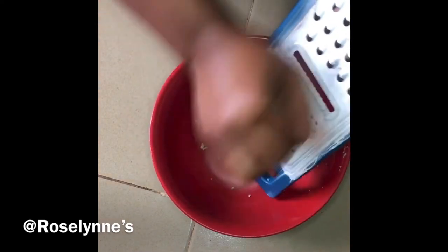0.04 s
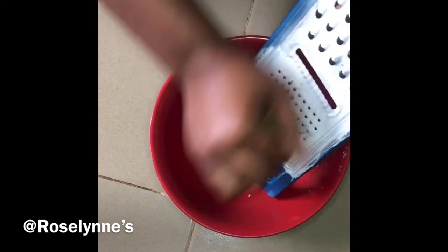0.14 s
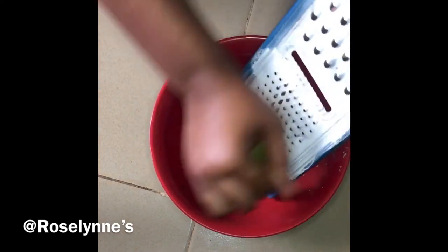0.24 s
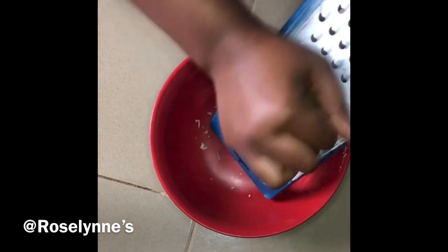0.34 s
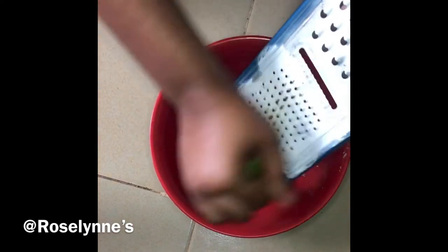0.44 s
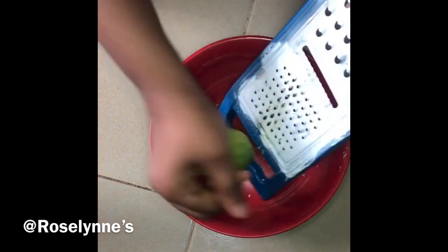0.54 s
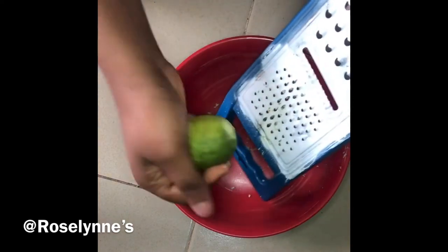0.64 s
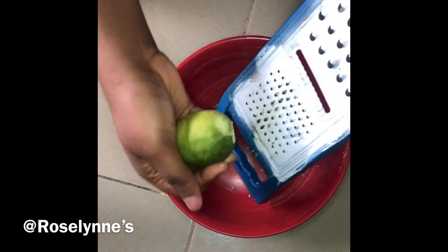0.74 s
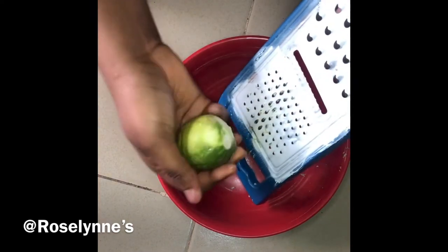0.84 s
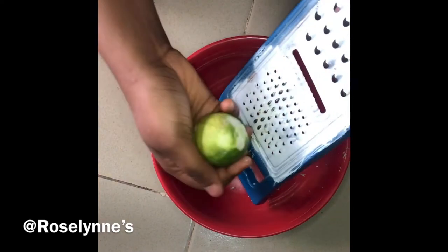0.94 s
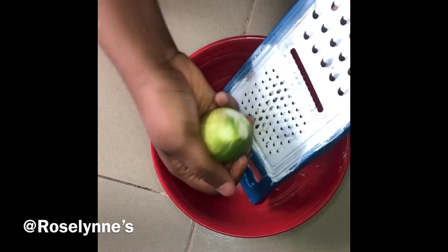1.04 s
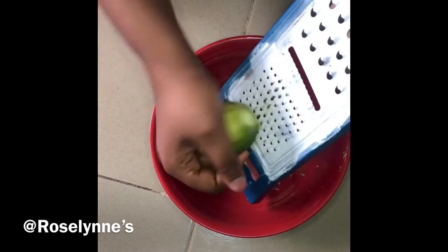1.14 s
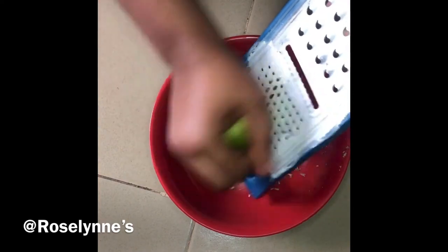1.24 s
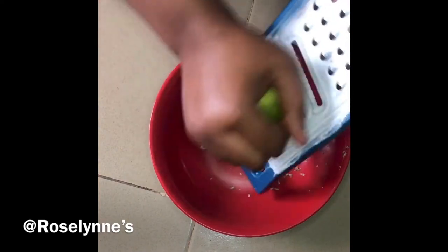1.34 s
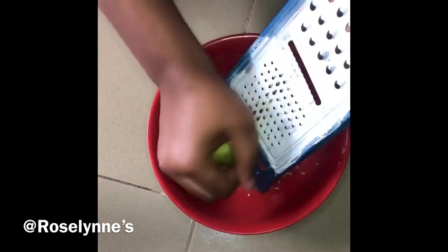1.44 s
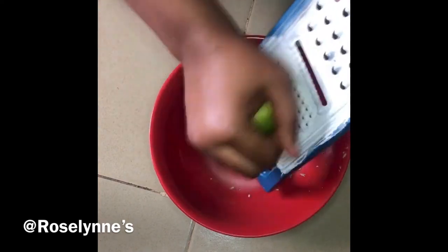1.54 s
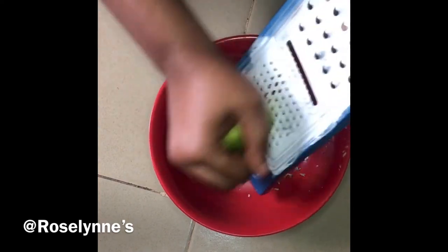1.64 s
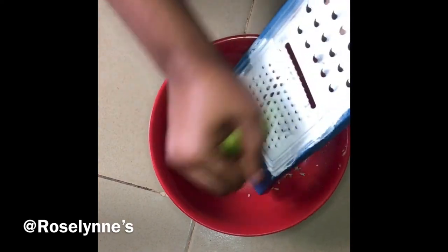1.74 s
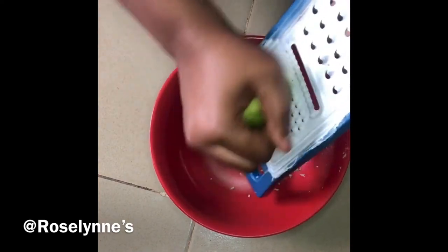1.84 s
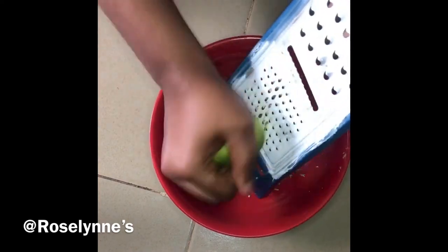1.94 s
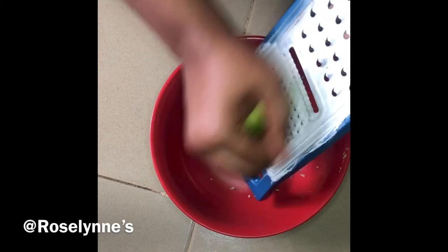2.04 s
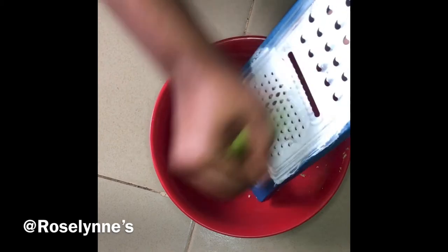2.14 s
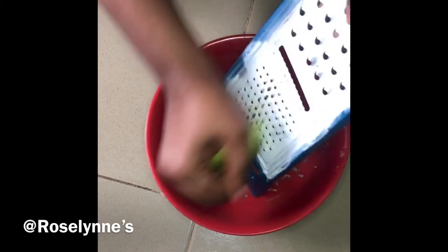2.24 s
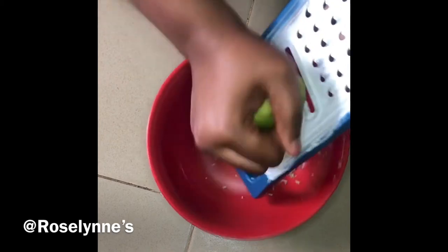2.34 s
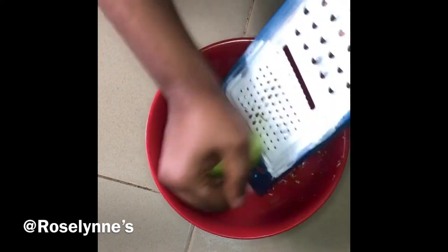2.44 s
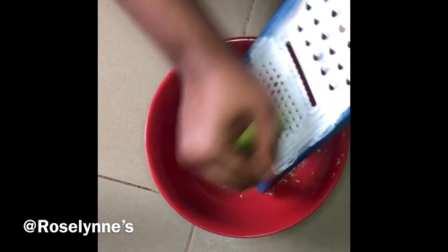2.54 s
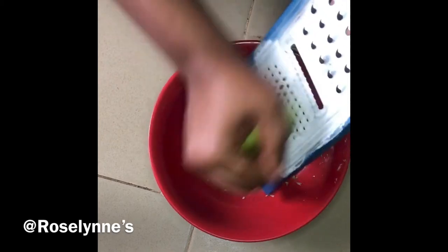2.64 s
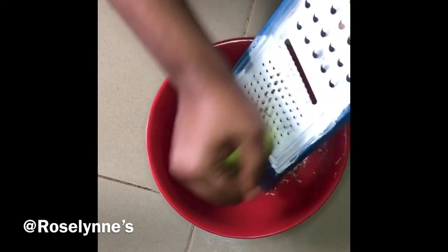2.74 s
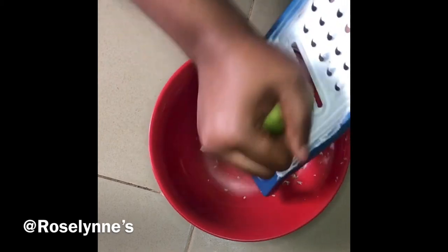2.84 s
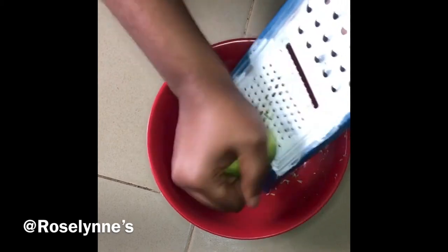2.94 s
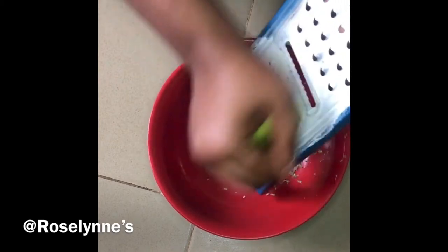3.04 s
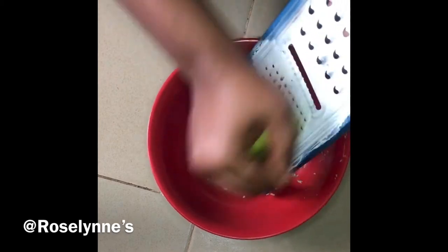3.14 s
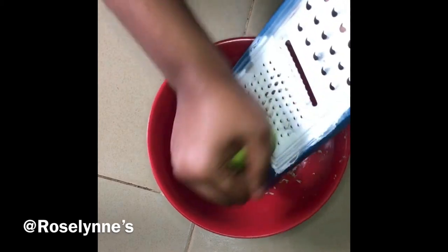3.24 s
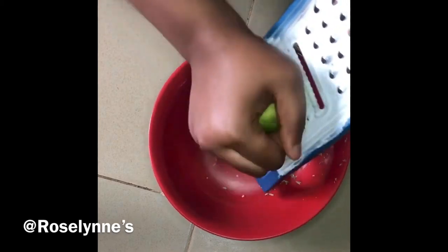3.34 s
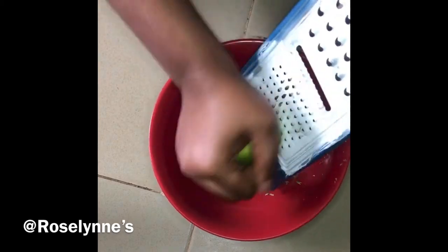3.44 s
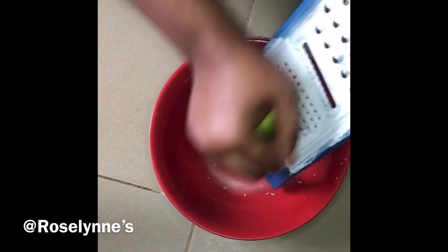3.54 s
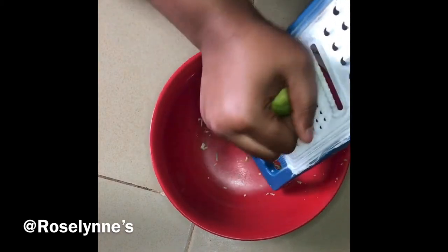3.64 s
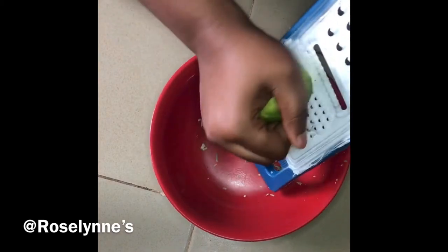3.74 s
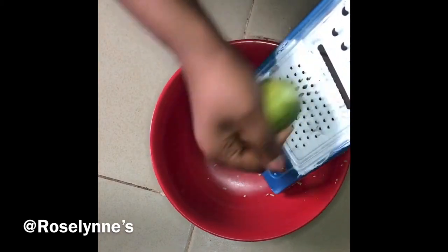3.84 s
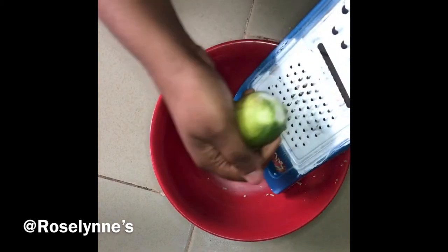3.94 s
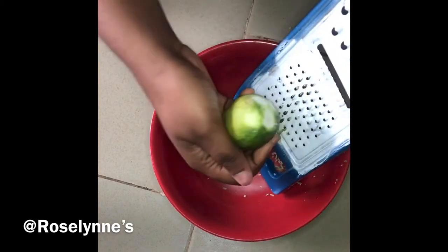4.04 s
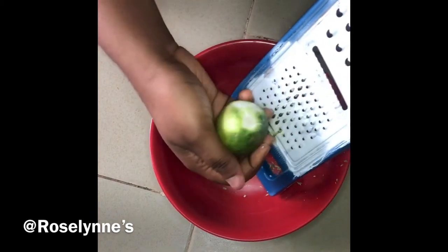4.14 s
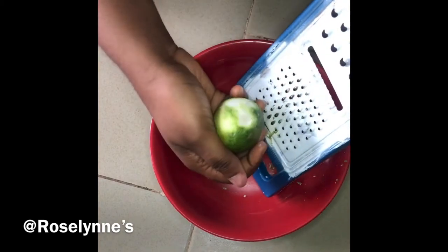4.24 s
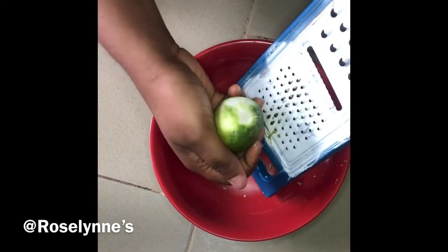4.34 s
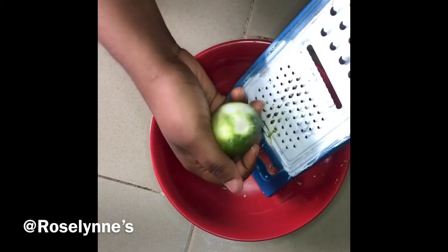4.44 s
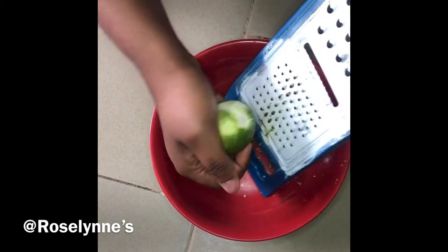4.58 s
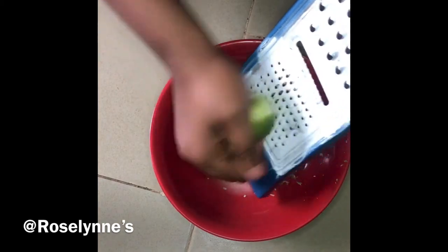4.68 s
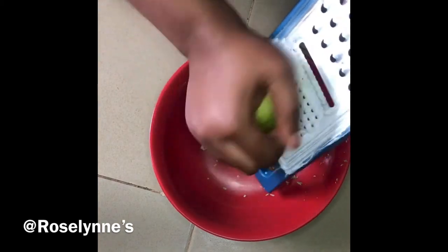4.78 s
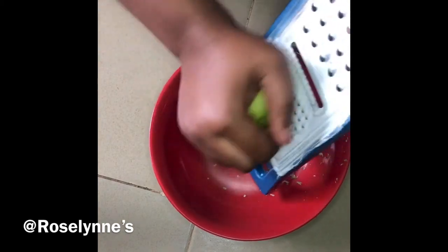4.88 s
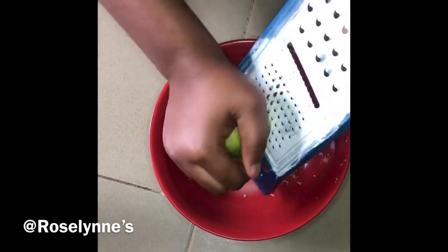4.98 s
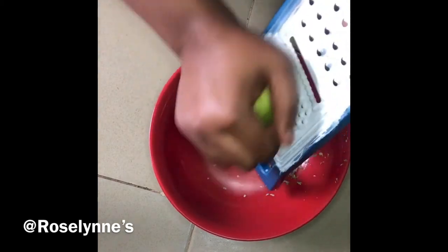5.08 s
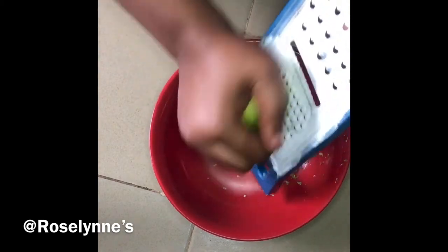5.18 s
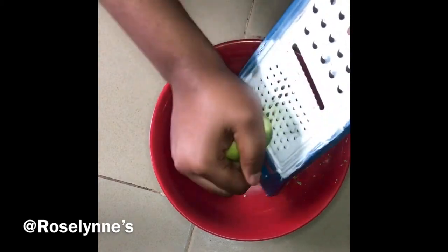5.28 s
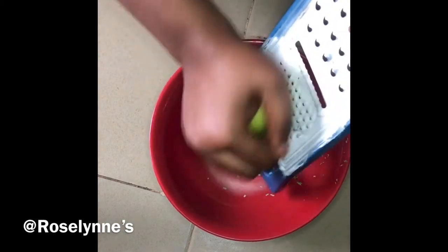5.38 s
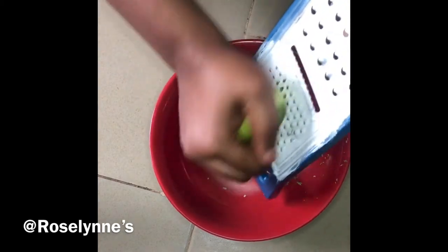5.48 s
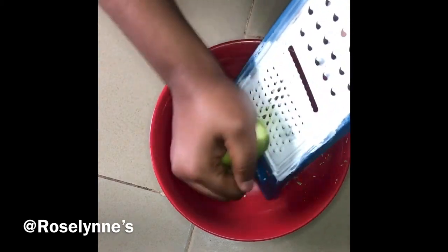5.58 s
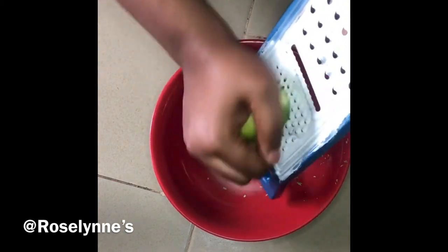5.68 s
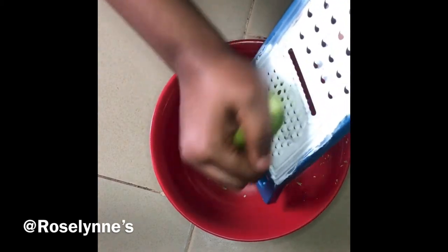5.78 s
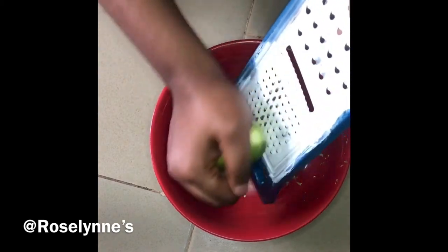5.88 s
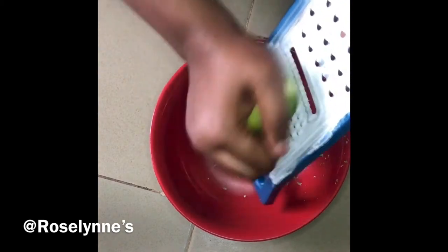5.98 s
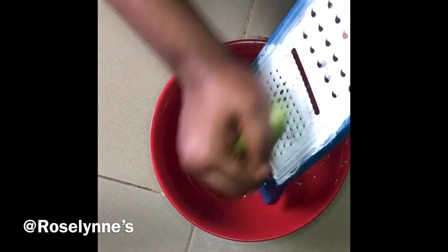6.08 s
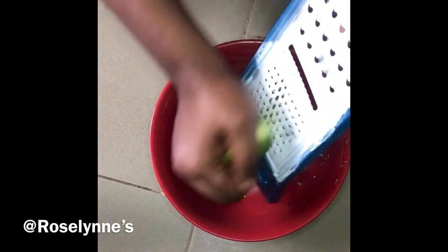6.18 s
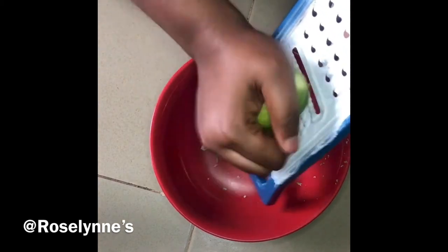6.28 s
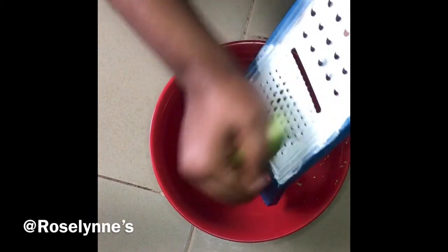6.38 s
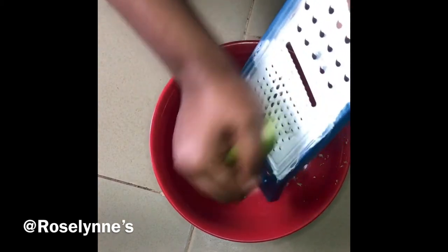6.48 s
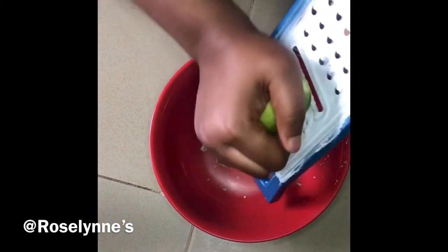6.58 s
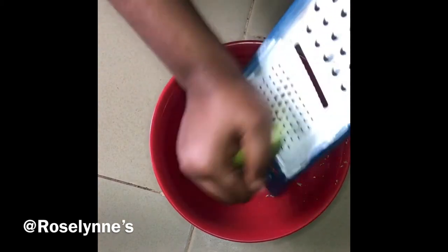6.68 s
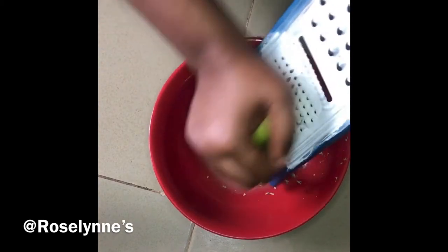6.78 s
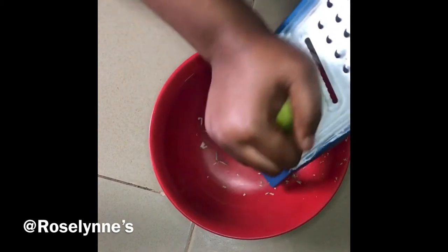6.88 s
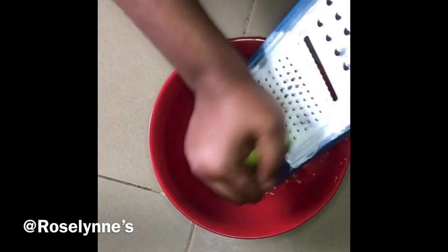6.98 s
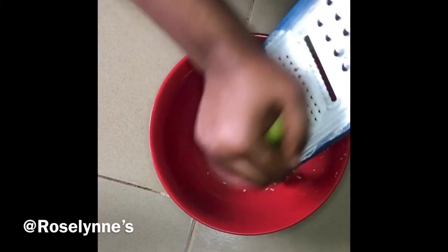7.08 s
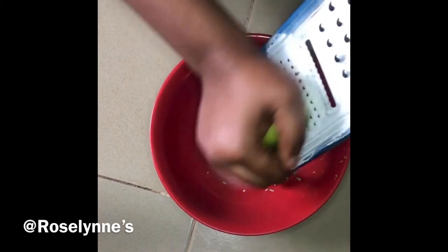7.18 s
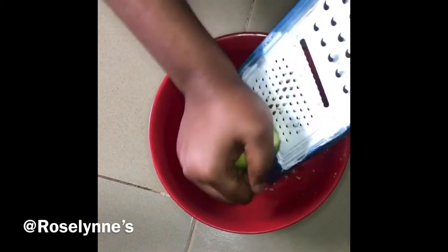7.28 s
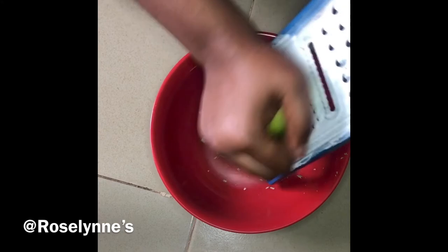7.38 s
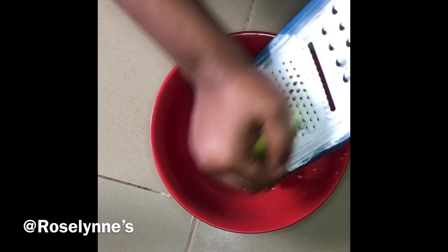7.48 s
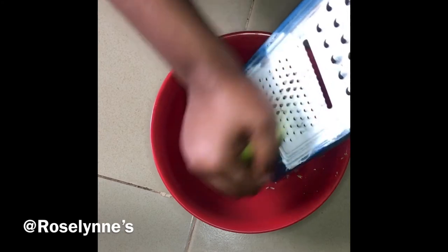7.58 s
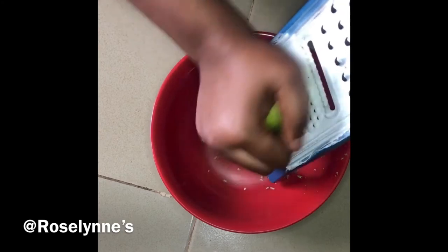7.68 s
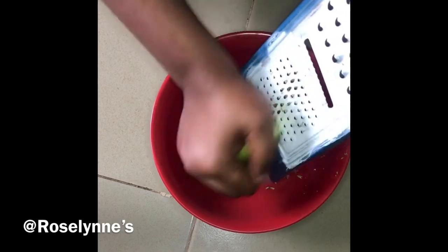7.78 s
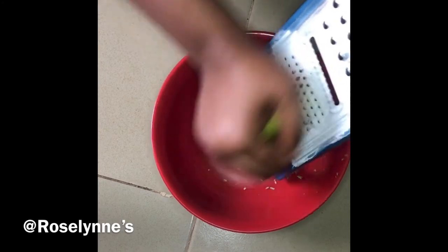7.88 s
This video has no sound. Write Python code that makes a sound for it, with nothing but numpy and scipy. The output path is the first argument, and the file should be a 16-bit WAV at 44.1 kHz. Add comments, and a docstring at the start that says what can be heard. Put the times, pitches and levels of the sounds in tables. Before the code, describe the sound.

A citrus fruit is rubbed quickly up and down a small steel grater, close to the microphone. After a few rasps and a short pause, the scraping resumes and the grater's foot knocks and bounces loudly in a plastic bowl. In a second pause fingers rustle faintly on the peel. Then steady grating returns with crisp snags and light taps, over a quiet kitchen hum.

```python
"""Bursts of tearing peel, close to the microphone: a citrus fruit is rubbed up and down a small steel
grater whose plastic foot stands in a plastic bowl on kitchen tiles. The teeth rasp and snag, plate
and bowl ring along, and at times the foot knocks and bounces in the bowl. In the pauses fingers
rustle on the peel. The room answers faintly, and the quiet kitchen hums behind it all."""
import sys
import numpy as np
from scipy import signal
from scipy.io import wavfile
from scipy.ndimage import uniform_filter1d

SR = 44100
rng = np.random.default_rng(int(sys.argv[2]) if len(sys.argv) > 2 else 0)


def int16_out(signal):
    """Quantize to a 16-bit WAV file."""
    q = np.round(np.clip(np.atleast_2d(signal).T, -1, 1) * 32767)
    wavfile.write(sys.argv[1], SR, q.astype(np.int16))


N = 349272

# Hard down, light back up. Each row: middle in seconds, swell in seconds, rasp in dB, push in dB.
STROKES = [(0, 0.03, -33.5, -35.5), (0.101, 0.031, -53.5, -40), (0.243, 0.032, -34.5, -32.5),
           (0.351, 0.038, -56.5, -43.5), (1.229, 0.038, -48, -49), (1.355, 0.027, -50.5, -48),
           (1.473, 0.029, -37, -40.5), (1.605, 0.043, -61, -58.5), (1.732, 0.035, -36, -39),
           (1.86, 0.051, -56.5, -49), (1.982, 0.03, -31.5, -37), (2.103, 0.033, -47.5, -49),
           (2.242, 0.039, -34, -36), (2.364, 0.033, -57, -45), (2.507, 0.044, -37, -40.5),
           (2.61, 0.038, -51, -44), (2.735, 0.041, -35.5, -41.5), (2.852, 0.047, -53, -54),
           (2.985, 0.039, -34.5, -40.5), (3.116, 0.054, -52.5, -49), (3.243, 0.044, -37.5, -49),
           (3.5, 0.045, -40, -37.5), (3.636, 0.045, -70, -62), (4.751, 0.02, -55, -51),
           (4.885, 0.046, -59.5, -58), (5.023, 0.041, -43, -48.5), (5.175, 0.052, -58.5, -56),
           (5.316, 0.035, -39, -43), (5.463, 0.051, -57, -56), (5.611, 0.044, -39, -44),
           (5.761, 0.033, -54.5, -51), (5.9, 0.037, -34.5, -39), (6.036, 0.042, -53, -47.5),
           (6.179, 0.043, -36.5, -39), (6.322, 0.043, -52, -48.5), (6.467, 0.042, -33.5, -39.5),
           (6.601, .04, -48.5, -51), (6.744, 0.046, -35, -44), (6.9, 0.051, -54.5, -48),
           (6.967, 0.027, -49, -53.5), (7.022, 0.034, -35.5, -36), (7.165, 0.05, -56.5, -51),
           (7.241, .02, -53, -51), (7.303, 0.038, -35.5, -36), (7.436, 0.03, -49, -46),
           (7.573, 0.037, -37, -34), (7.694, 0.044, -52.5, -44.5), (7.832, 0.037, -33.5, -36)]
# Teeth catching hard in the peel. Each row: start in seconds, force in dB.
SNAGS = [(0.212, -28.5), (0.259, -26), (0.427, -49), (.499, -60), (1.238, -26.5), (1.4453, -33),
         (1.479, -23), (1.686, -35), (1.951, -30), (1.979, -40), (2.014, -23.5), (2.251, -19.5),
         (2.462, -46), (3.212, -26), (3.4707, -32), (3.486, -28), (3.63, -46), (3.711, -52), (4.629, -43),
         (4.666, -52), (4.6977, -44.5), (4.737, -40), (4.751, -30.5), (4.962, -42), (4.973, -37.5),
         (4.991, -30), (5.005, -24), (5.015, -30), (5.029, -31), (5.039, -33.5), (5.064, -35),
         (5.274, -39.5), (5.292, -31), (5.3048, -27), (5.326, -21), (5.42, -53), (5.553, -42),
         (5.5735, -27), (5.577, -24), (5.6122, -21), (5.639, -25.5), (5.747, -42.5), (5.764, -54),
         (5.8513, -30.5), (5.864, -26), (5.898, -21.5), (5.93, -33), (6.039, -36.5), (6.1212, -29.5),
         (6.1413, -23.5), (6.1558, -20.5), (6.168, -16.5), (6.196, -26), (6.218, -29), (6.417, -30.5),
         (6.691, -36), (6.713, -27.5), (6.7576, -29), (7.28, -42), (7.319, -25.5), (7.549, -39),
         (7.565, -23.5), (7.808, -39), (7.8291, -25)]
# Tearing peel. Each row: frequency in Hz, relative noise density in dB.
TEAR_SPECTRUM = [(120, -34.5), (200, -0.5), (491, -11.5), (659, -2.5), (1180, -10.5), (1370, -8.5),
                 (1680, -17.5), (2130, -4.5), (9230, -8), (16000, -19)]
# The steel plate singing under a stroke. Each row: frequency in Hz, width in Hz, level in dB.
RUBBED_PLATE = [(2148, 63, -7), (2950, 72, -9.5), (3556, 170, 0), (4470, 500, -1), (5230, 110, -6.5),
                (8615, 780, 0.5)]
# The bowl singing under a stroke. Each row: frequency in Hz, width in Hz, level in dB.
RUBBED_BOWL = [(176, 72, -14), (1015, 220, -5), (2060, 350, -9.5)]
# The bowl's two hollow tones shift as the foot finds a new seat.
# Each row: time in seconds, low tone in Hz, high tone in Hz, gain of the high tone in dB.
SEAT_TONES = [(0, 700, 1466, 7.5), (.25, 770, 1504, -8), (1.4, 700, 1488, 1.5), (1.999, 700, 1447, -12),
              (3.501, 700, 1413, -0.5), (5.001, 780, 1495, -0.5), (5.35, 780, 1450, -2.5),
              (5.9, 760, 1453, -1), (6.2, 720, 1423, -3), (6.751, 760, 1556, -2.5), (7.0, 650, 1377, -4.5),
              (7.3, 680, 1407, -4), (7.57, 750, 1406, -6.5), (7.851, 720, 1388, -4)]
# Room tone. Each row: frequency in Hz, relative noise density in dB.
HUM_SPECTRUM = [(30, -35.5), (51, -2), (123, -6), (307, -9.5), (369, -17), (532, -16.5), (945, -20.5),
                (1230, -21), (9000, -41), (15500, -46)]
# The foot hitting the bowl. Each row: start in seconds, level in dB, bowl pitch in Hz,
# upper modes in dB, hardness in dB, T60 of the bowl's low tone in seconds.
KNOCKS = [(.075, -48.5, 744, 3, 13, 0.023), (.174, -33.5, 645, -20, -19, .034),
          (1.376, -34.5, 700, 3, -18, 0.021), (1.424, -37.5, 750, 5, -14, 0.028),
          (1.734, -8, 730, -8.5, -13, 0.046), (2.153, -18, 665, -16, -26, 0.026),
          (2.179, -4.5, 597, -17, -14, 0.018), (2.193, -11, 570, -20, -24, 0.019),
          (2.229, -17, 523, -9, -22, 0.045), (2.243, -22, 547.6, -7.5, -13.5, 0.03),
          (2.282, -11, 560, -17, -26, 0.021), (2.293, -15.5, 600, -24, -24, 0.034),
          (2.307, -6, 584, -10, -10.5, .05), (2.317, 3.5, 709, -13, -8.5, .025),
          (2.476, -30, 674, 4, 3, 0.014), (2.54, -2, 786, -1, -1, 0.021),
          (2.552, 0.5, 760, -11.5, -9, 0.021), (2.56, 0, 634, -6.5, -6, 0.025),
          (2.578, -12.5, 716, -7, -16, .034), (2.597, -27, 682, 7, -7, 0.029),
          (2.763, -3, 665, -5.5, -5, 0.04), (3.065, -28, 665, -19, -19, 0.026),
          (3.094, -38.5, 674, 4.5, -2, .034), (3.11, -40.5, 710, 6.5, 4, .034),
          (3.292, -1.5, 757, -8.5, -6, 0.02), (3.298, -5, 630, -25, -10, 0.031),
          (3.323, -33, 614, 4, -11, .03), (3.355, -2, 685, -11.5, -5, 0.049),
          (3.381, -12.5, 687, -6.5, -5.5, 0.051), (3.402, -13.5, 670, -13.5, -16, 0.066),
          (3.616, -31.5, 678, -43, -15, 0.055), (4.686, -38.5, 695, 1, -5, 0.029),
          (5.585, -31, 720, -30, -16, .034), (5.795, -35.5, 850, -32, -18, 0.023),
          (6.66, -35, 670, -14, 1.5, 0.048), (6.756, -34, 600, -11, -10, 0.036),
          (6.88, -44.5, 643, 9, 7, .03), (6.96, -36, 620, -24, -16, 0.076),
          (7.063, -30, 621, -31, -3, 0.026), (7.075, -26.5, 694, -37, -28, 0.039),
          (7.177, -42, 603, 5.5, -20, 0.027), (7.224, -43.5, 640, 1, 3, 0.031),
          (7.412, -47, 710, 5.5, 0, 0.029), (7.458, -43.5, 750, 9, -15, 0.04),
          (7.68, -28, 748, -10.5, -7, 0.042), (7.868, -31, 690, -13, -8, 0.043)]
# The struck bowl's upper modes. Each row: frequency in Hz, level in dB, T60 in seconds.
BOWL_MODES = [(415, -13, 0.053), (961, -4.5, 0.06), (1332.4, 2.5, 0.036), (1240, -22, 0.14)]
# The grater's plastic foot. Each row: frequency in Hz, level in dB, T60 in seconds.
FOOT_MODES = [(2019, 0.5, 0.046), (2022, -2, 0.02), (1925, -25, 0.3)]
# The jolted steel plate. Each row: frequency in Hz, level in dB, T60 in seconds.
PLATE_MODES = [(2933, -2, 0.018), (3280, -2, 0.058), (3520, -6, 0.06), (3560, 5.5, 0.035),
               (4360, -7, 0.025), (4950, -6.5, 0.026)]
# Fingers turning the fruit. Each row: middle in seconds, swell in seconds, level in dB.
FRUIT_TURNS = [(.5, .06, -69), (.74, 0.12, -65.5), (3.76, 0.041, -64), (4.08, 0.11, -70.5),
               (4.53, 0.074, -69.5), (4.681, 0.057, -60.5)]
# Skin sliding on peel. Each row: frequency in Hz, relative noise density in dB.
SKIN_SPECTRUM = [(800, -19), (2000, 5), (3500, -0.5), (5500, -1.5), (8000, -8), (11000, -15), (16000, -30)]
# The kitchen's reverberation. Each row: frequency in Hz, T60 in seconds.
ROOM_DECAY = [(300, 0.17), (1500, 0.28), (5000, 0.27), (14000, 0.17)]


def gain_of(db):
    """Decibels to amplitude."""
    return 10 ** (np.asarray(db) / 20)


def unit_rms(x):
    """Scales to rms 1."""
    return x / np.sqrt(np.mean(x ** 2) + 1e-20)


def curve_at(points, hz):
    """Reads a curve on a log-frequency axis."""
    f, value = np.transpose(points)
    return np.interp(np.log(hz + 1), np.log(f + 1), value)


def add(mix, s, sound):
    """Lays a sound into the mix at s seconds."""
    part = mix[round(s * SR):][:len(sound)]
    part += sound[:len(part)]


def patchy_noise(spectrum, depth_db, size):
    """Noise of a given spectrum whose colour drifts in patches a few frames long and a few bins wide."""
    frames, hz = 4 * N // size + 5, np.fft.rfftfreq(size, 1 / SR)
    real, imag, patches = rng.standard_normal((frames, len(hz), 3)).T
    patches = unit_rms(uniform_filter1d(uniform_filter1d(patches, size=5, axis=0), size=8, axis=1))
    bins = (real + 1j * imag) * gain_of(curve_at(spectrum, hz)[:, None] + depth_db * patches)
    return unit_rms(signal.istft(bins, nperseg=size, noverlap=3 * size // 4)[1][:N])


def hand_strokes():
    """Rasp on the teeth and push into the bowl: both swell to mid-stroke and fall as the hand turns."""
    t = np.arange(0, N + 32, 32) / SR
    rasp, push = np.zeros((2, len(t)))
    for middle, swell, rasp_db, push_db in STROKES:
        away = np.minimum(np.abs(t - middle) / swell, 4)
        squareness = np.where(t < middle, 2.3, 2.6)  # the rasp breaks off more squarely than it sets in
        rasp += gain_of(rasp_db - 11 * away ** squareness)
        push += gain_of(push_db - 9.5 * away ** 2)  # the weight leaves the foot more slowly
    return (np.interp(np.arange(N) / SR, t, force) for force in (rasp, push))


def slips(per_s, length_s):
    """Stick and slip: short swells at random moments over a steady drag, mean power 1."""
    starts = (rng.random(N) < per_s / SR).astype(float)
    age = np.arange(1500) / SR / length_s
    return unit_rms(0.4 + signal.oaconvolve(starts, age ** 2 * np.exp(-age ** 2))[:N])


def grating():
    """Peel tears in bursts under each stroke; it shakes the plate and, through the foot, the bowl."""
    rasp, push = hand_strokes()
    tooth_force = np.hypot(rasp * slips(per_s=140, length_s=0.0035), snags())
    tear = tooth_force * patchy_noise(TEAR_SPECTRUM, depth_db=4, size=256)
    plate = chatter(tooth_force, RUBBED_PLATE, per_s=490, spread_db=-2)
    bowl = chatter(push, RUBBED_BOWL, per_s=500, spread_db=4.5) + hollow_bowl(push, tooth_force)
    return tear + gain_of(-10.5) * plate + gain_of(-0.5) * bowl


def contact_taps(per_s, spread_db):
    """Tiny impacts of uneven strength at random moments."""
    strength = gain_of(spread_db * np.minimum(rng.exponential(1, N), 4))
    return strength * (rng.random(N) < per_s / SR)


def chatter(force, resonances, per_s, spread_db):
    """The contact wanders under a force, so each resonance gets taps of its own and rings out."""
    out = np.zeros(N)
    for hz, width, db in resonances:
        taps = contact_taps(per_s, spread_db)
        b, a = signal.iirpeak(hz, hz / width, SR)
        unit = np.std(signal.lfilter(b, a, taps))
        out += gain_of(db) * signal.lfilter(b, a, force * taps) / unit
    return out


def hollow_bowl(push, tooth_force, low_width_hz=113.7, high_width_hz=95):
    """Small taps of the foot ring two tones that follow its seat; the higher also answers the teeth."""
    times, *columns = np.transpose(SEAT_TONES)
    low_hz, high_hz, high_db = (np.interp(np.arange(N) / SR, times, column) for column in columns)
    high_drive = np.hypot(gain_of(-3) * push, gain_of(-6.5) * tooth_force)
    tones = (low_hz, low_width_hz, 0, push), (high_hz, high_width_hz, high_db, high_drive)
    out = np.zeros(N)
    for hz, width, db, drive in tones:
        taps = contact_taps(per_s=450, spread_db=3.4) * rng.choice([-1, 1], N)
        drift = unit_rms(uniform_filter1d(rng.standard_normal(N // 256 + 1), size=8))
        wavering_hz = hz * (1 + 0.05 * np.repeat(drift, 256)[:N])  # the contact moves
        # A gliding resonance: shift down by the pitch, low-pass, shift back up.
        carrier = np.exp(2j * np.pi * np.cumsum(wavering_hz) / SR)
        pole = np.exp(-np.pi * width / SR)
        b, a = [(1 - pole) ** 2], [1, -2 * pole, pole ** 2]
        unit = np.std(signal.lfilter(b, a, taps / carrier))
        out += gain_of(db) * (carrier * signal.lfilter(b, a, drive * taps / carrier)).real / unit
    return out


def kitchen_hum():
    """Room tone: a steady low hum and hiss behind the grater."""
    return gain_of(-56) * patchy_noise(HUM_SPECTRUM, depth_db=1.5, size=2048)


def room_reflections(near):
    """Sparse echoes come back off tiles and walls, each band dying at its own speed."""
    echoes = np.zeros(SR // 2)
    slots = np.arange(200, len(echoes) - 20, 20)
    echoes[slots + rng.integers(0, 20, len(slots))] = rng.choice([-1., 1.], len(slots))
    hz, t, bins = signal.stft(echoes, SR, nperseg=256)
    decay = gain_of(-60 * t / curve_at(ROOM_DECAY, hz)[:, None])
    tail = signal.istft(bins * decay, SR, nperseg=256)[1]
    return signal.fftconvolve(near, tail / np.linalg.norm(tail))[:N]


def ring(modes, t, loose):
    """Dying sines, a little off from blow to blow, their phase shaken by the loose contact."""
    offsets = rng.standard_normal((len(modes), 2))
    shakes = loose * uniform_filter1d(rng.standard_normal((len(modes), len(t))), size=120, axis=1)
    out = np.zeros(len(t))
    for (hz, db, t60), (louder, detune), shake in zip(modes, offsets, shakes):
        envelope = gain_of(db + 2 * louder - 60 * t / t60)
        out += envelope * np.sin(2 * np.pi * hz * (1 + 0.014 * detune) * t + shake)
    return out


def foot_knock(db, hz, upper_db, hard_db, t60, crack_t60=0.018, rattle_t60=0.19, rim_hz=962):
    """One blow: the plate starts at once, the bowl swells briefly, then its rim rattles on the tiles."""
    t = np.arange(6000) / SR
    low = ring([(hz, 0, t60)], t, loose=1) * (1 - np.exp(-t / 0.0011))
    upper = gain_of(upper_db) * ring(BOWL_MODES, t, loose=3.5)
    foot = gain_of(-12 + 0.37 * upper_db) * ring(FOOT_MODES, t, loose=2.5)
    plastic = low + (upper + foot) * (1 - np.exp(-t / 0.0015))
    plate = gain_of(hard_db - 13.5) * ring(PLATE_MODES, t, loose=16)
    hiss = signal.lfilter(*signal.butter(2, (3000, 13000), "band", fs=SR), rng.standard_normal(len(t)))
    crack = gain_of(hard_db - 11.5 - 60 * t / crack_t60) * hiss
    rim = signal.lfilter(*signal.iirpeak(rim_hz, Q=1.8, fs=SR), rng.standard_normal(len(t)))
    rattle = gain_of(-13 - 60 * t / rattle_t60) * rim * (1 - np.exp(-t / 0.035))
    return gain_of(db) * (plastic + plate + crack + rattle)


def snags(swell_s=0.0029, bite_t60=0.0063):
    """Force of teeth catching in the peel: a sudden bite, then a short swell that dies away."""
    t = np.arange(4000) / SR
    bite = gain_of(-8 - 60 * t / bite_t60)
    swell = t / swell_s * np.exp(-t / swell_s)
    force = np.zeros(N)
    for start, db in SNAGS:
        add(force, start, gain_of(db) * (bite + swell))
    return force


def fingers():
    """A soft rustle of skin on peel, swelling and fading with each turn of the fruit."""
    t = np.arange(N) / SR
    swell = sum(gain_of(db) * np.exp(-((t - middle) / width) ** 2) for middle, width, db in FRUIT_TURNS)
    return swell * patchy_noise(SKIN_SPECTRUM, depth_db=4, size=512)


def scene():
    """Grating, knocks and fingers up close, the room and its hum behind them, in mono."""
    knocks = np.zeros(N)
    for start, *blow in KNOCKS:
        add(knocks, start, foot_knock(*blow))
    small_plastic = signal.butter(3, (330, 14000), "band", fs=SR, output="sos")  # no bass, no top
    near = grating() + signal.sosfilt(small_plastic, knocks) + fingers()
    return (near + gain_of(-16.5) * room_reflections(near) + kitchen_hum())[None]


def record(dry, bass_hz=48, ceiling=0.97, top_hz=15900):
    """The small microphone loses the deepest bass, rounds off the loudest knocks and cuts the top."""
    thin = signal.sosfilt(signal.butter(4, bass_hz, "high", fs=SR, output="sos"), dry)
    rounded = thin / (1 + (thin / ceiling) ** 4) ** (1 / 4)
    low_pass = signal.firwin(511, top_hz, window=("kaiser", 9), fs=SR)
    return signal.oaconvolve(rounded, low_pass[None], "same")


dry = scene()
out = record(dry)
int16_out(out)
```